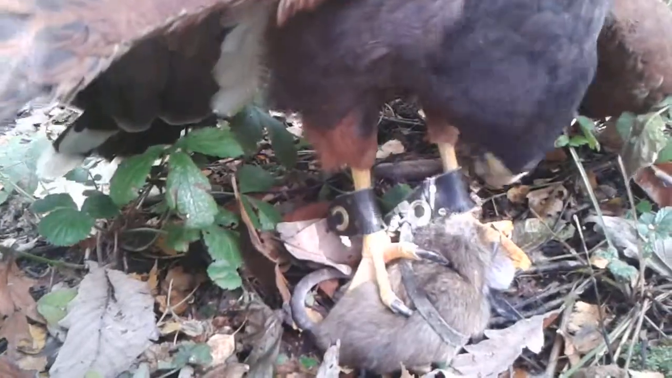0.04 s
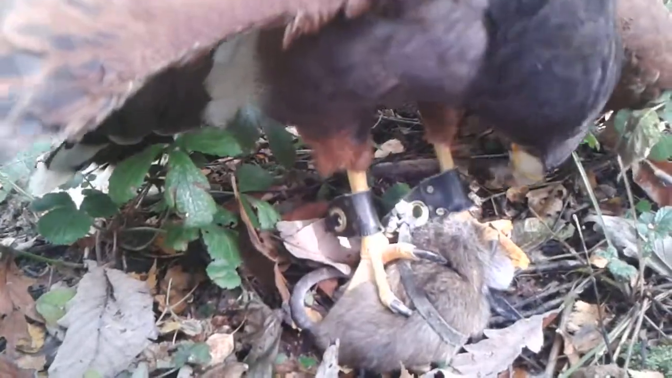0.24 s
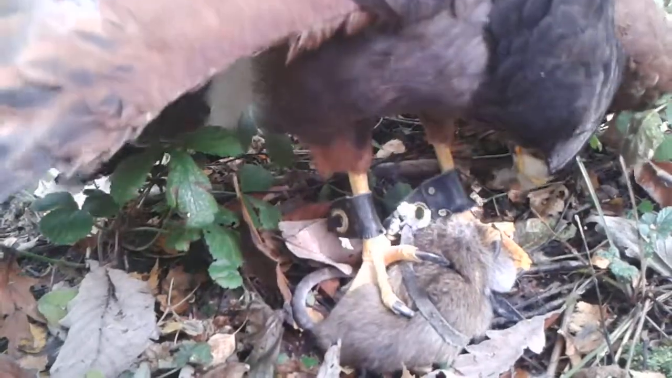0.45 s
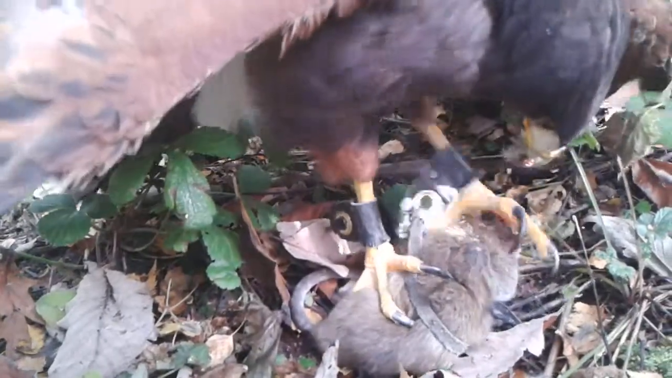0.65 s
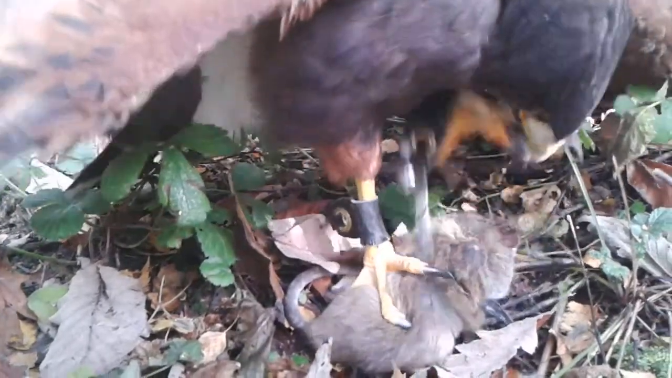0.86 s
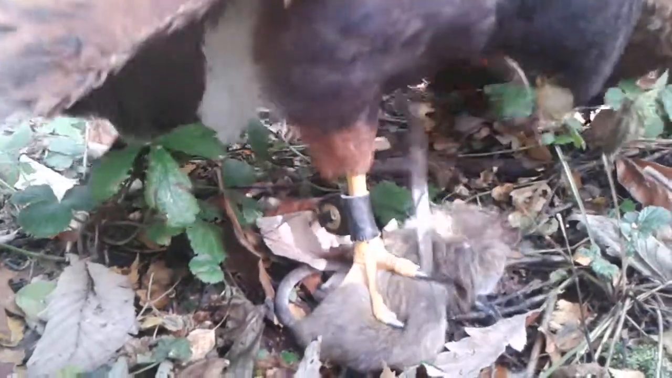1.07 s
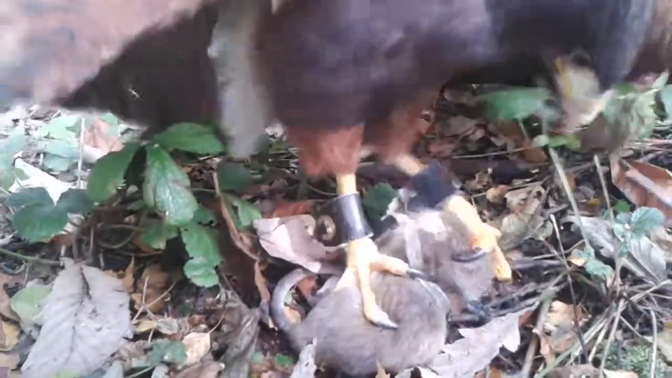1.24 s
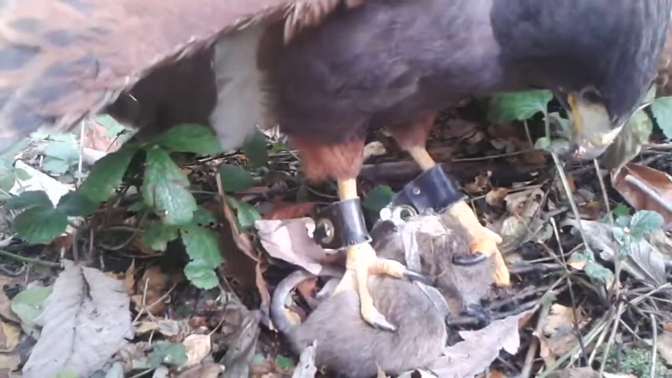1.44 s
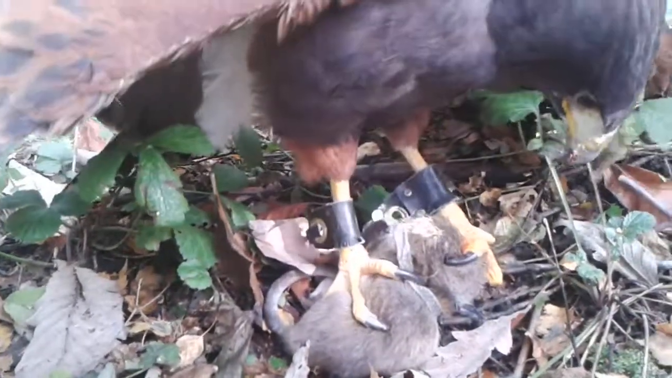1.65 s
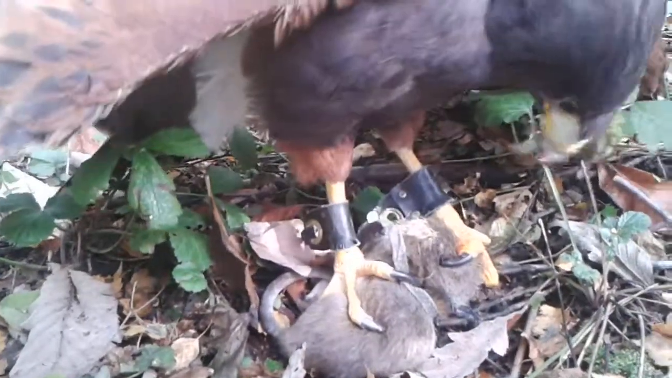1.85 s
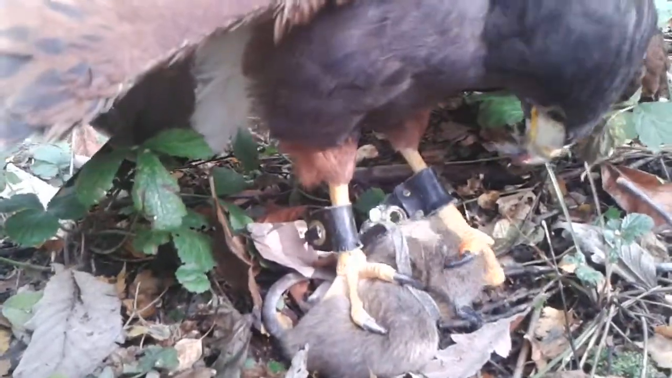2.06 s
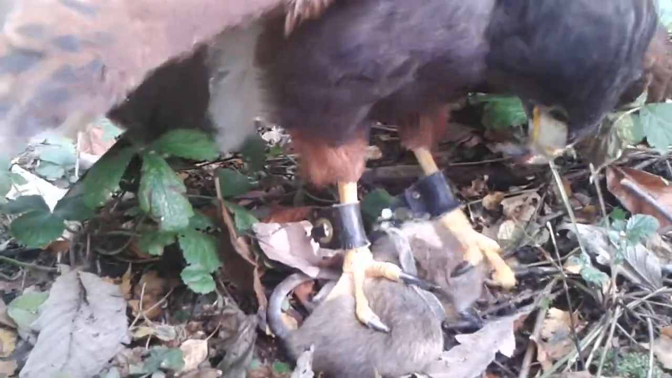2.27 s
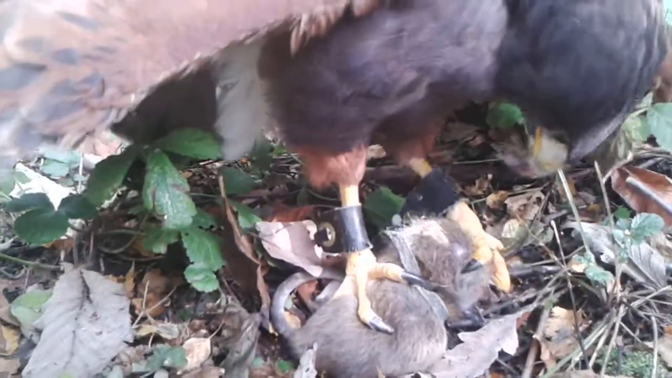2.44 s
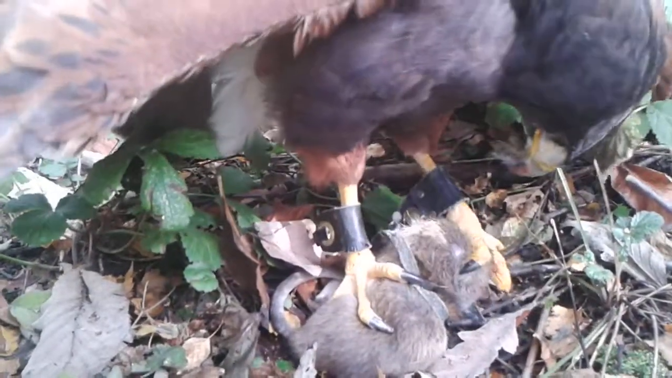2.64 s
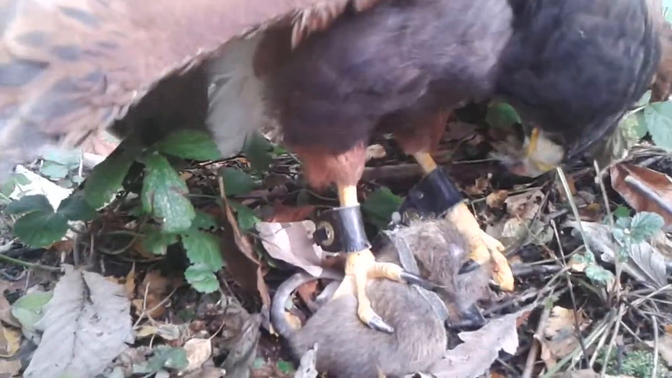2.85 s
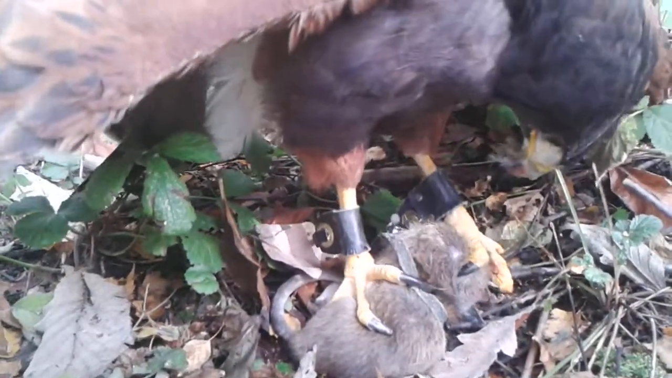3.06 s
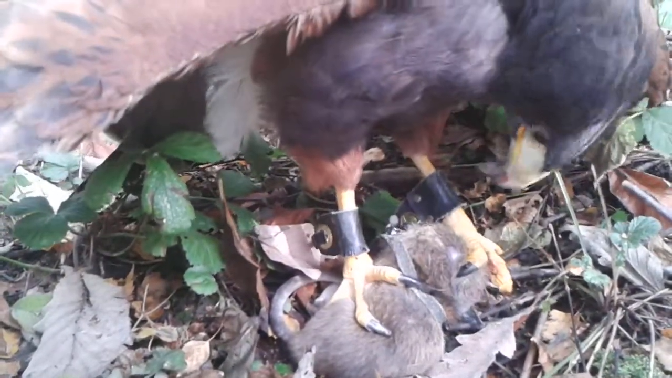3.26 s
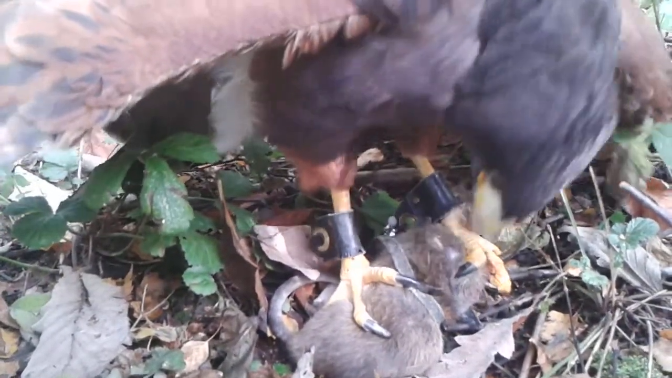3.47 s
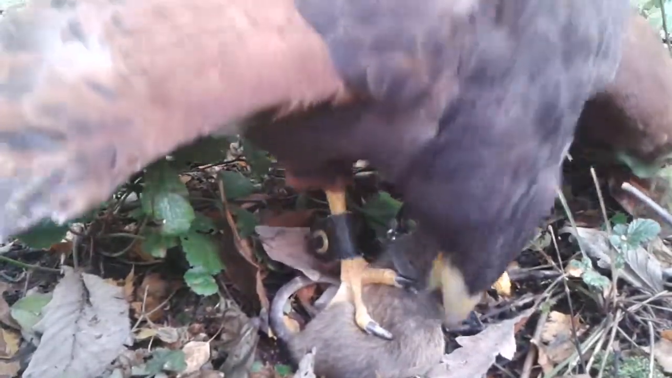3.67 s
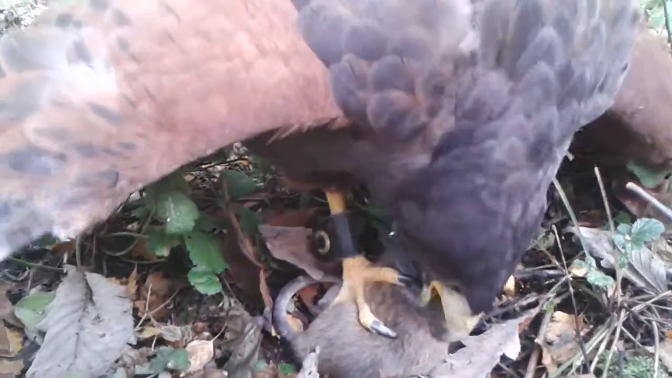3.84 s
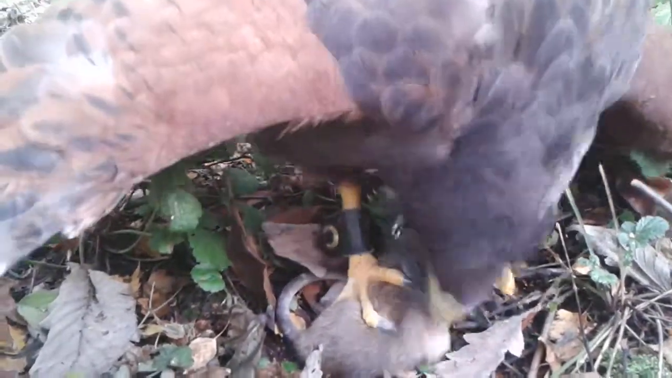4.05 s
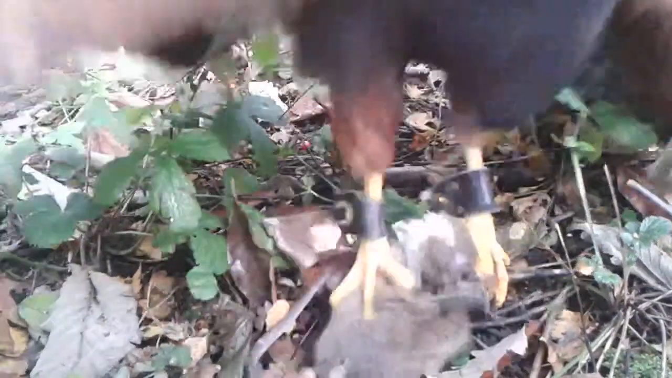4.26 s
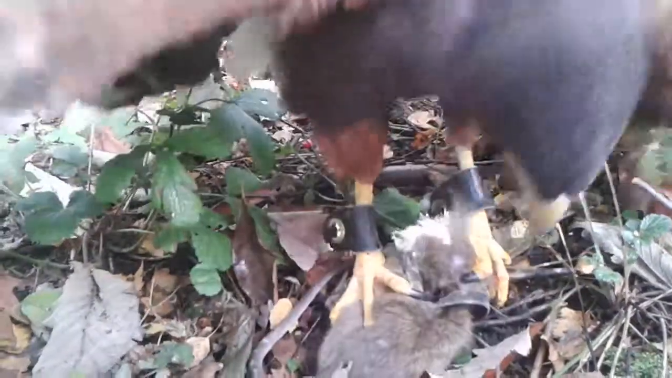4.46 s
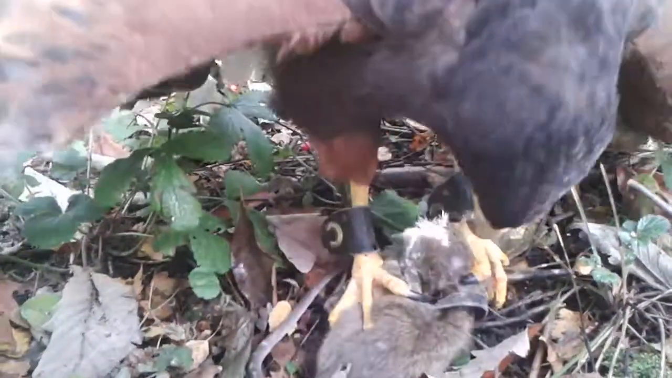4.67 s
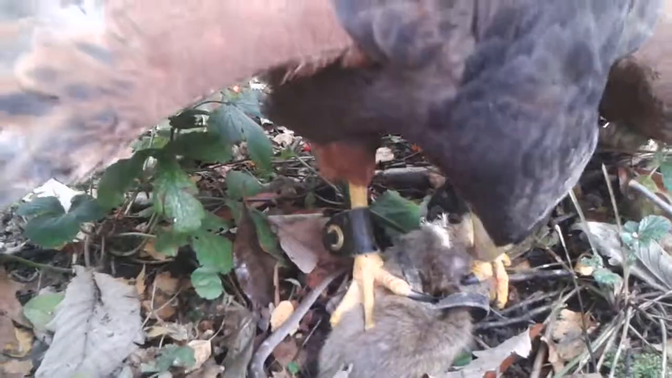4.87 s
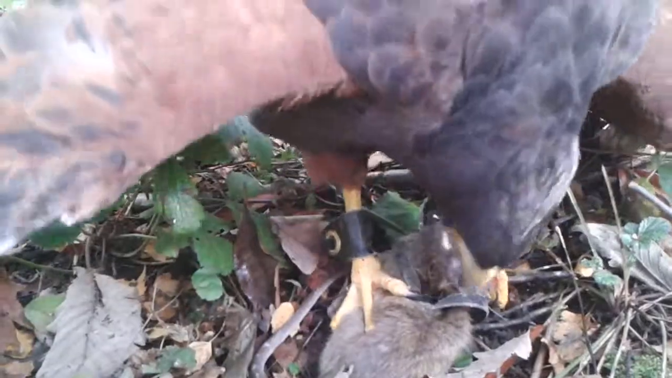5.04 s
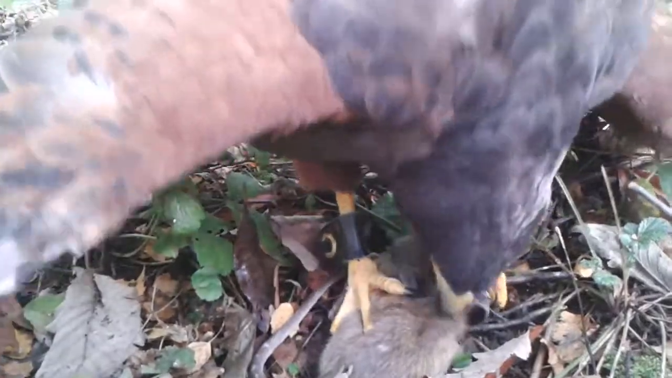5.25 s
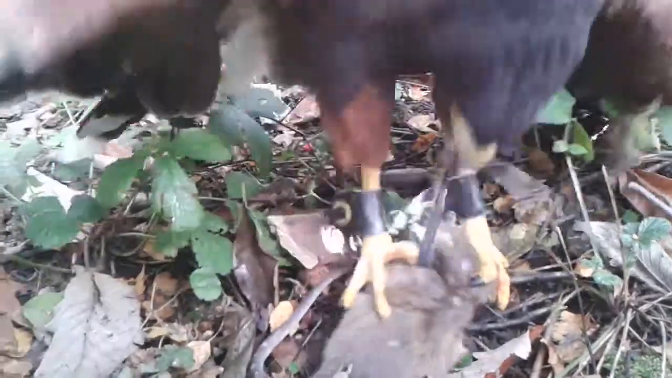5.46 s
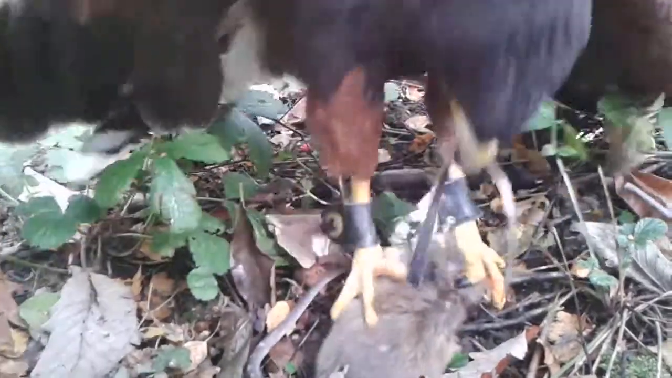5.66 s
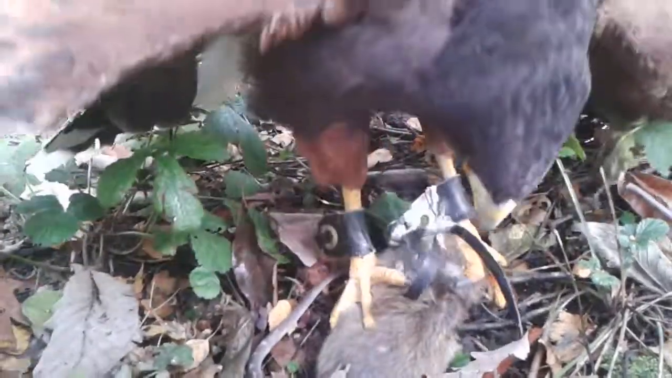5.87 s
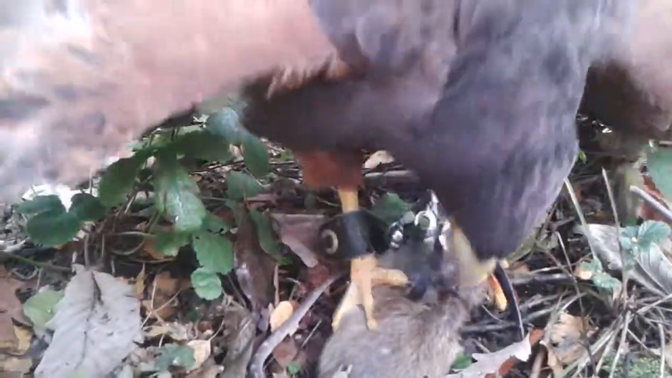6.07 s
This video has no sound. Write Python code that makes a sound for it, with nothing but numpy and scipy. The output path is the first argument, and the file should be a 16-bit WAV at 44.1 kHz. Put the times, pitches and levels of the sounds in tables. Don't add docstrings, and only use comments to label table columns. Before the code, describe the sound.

Quiet woodland floor with faint low air, broken by rattling high bell jingles, crisp leaf crackle and a few hard snaps

```python
import sys
import numpy as np
from scipy import signal
from scipy.io import wavfile
from scipy.ndimage import uniform_filter1d

SR = 44100
rng = np.random.default_rng(int(sys.argv[2]) if len(sys.argv) > 2 else 0)


def pcm_store(signal):
    levels = np.round(np.clip(np.atleast_2d(signal), -1, 1) * 32767)
    wavfile.write(sys.argv[1], SR, levels.astype(np.int16).T)


def voltage_ratio(decibels):
    exponent = np.asarray(decibels, float) / 20
    return 10 ** exponent


N = 269451


def rms_one(x):
    return x / np.sqrt(np.mean(x ** 2) + 1e-20)


def band(x, low_hz, high_hz, order):
    return signal.sosfilt(signal.butter(order, [low_hz, high_hz], "band", fs=SR, output="sos"), x)


def resonance(x, hz, width_hz):
    r = np.exp(-np.pi * width_hz / SR)
    feedback = [1, -2 * r * np.cos(2 * np.pi * hz / SR), r * r]
    return signal.lfilter([(1 - r * r) / 2, 0, (r * r - 1) / 2], feedback, x)


def clicks(seconds, sizes):
    train = np.full(N, 1e-18)
    np.add.at(train, (np.asarray(seconds) * SR).astype(int), sizes)
    return train


def drift(rate_hz):
    r = np.exp(-80 * np.pi * rate_hz / SR)
    noise = rng.standard_normal(N // 40 + 2002)
    slow = signal.lfilter([1], [1, -2 * r, r * r], noise)[2000:]
    return np.interp(np.arange(N) / 40, np.arange(len(slow)), rms_one(slow))


def coloured(sources, spectrum, patchy_db):
    hz, level_db = np.transpose(spectrum)
    edges = 22 * 2 ** np.arange(0, 9.7, 1 / 3)
    out = 0
    for k, (low, high) in enumerate(zip(edges, edges[1:])):
        band_db = np.interp(np.log(low * high) / 2, np.log(hz), level_db)
        gain = voltage_ratio(band_db + patchy_db * drift(6.3))
        out = out + gain * band(sources[k % 2], low, high, order=2)
    return rms_one(out)


def woodland_floor():
    # pitch_hz [Hz], density_db [dB per Hz]
    wood = [(35, -30.5), (60, -11.5), (129, -1.5), (298, -7), (376, -13), (1050, -23.5), (4200, -15.5),
            (15500, -37)]
    return voltage_ratio(-57.5 - 2.5) * coloured(rng.standard_normal((2, N)), wood, patchy_db=0.07)


def stirring():
    # peak_s [s], crisp_db [dB], dull_db [dB], fall_s [s to fall by 20 dB]
    stirs = [(.02, -68, -65, 7.5), (.69, -56, -59.5, 1), (.9, -51, -57, .75), (1.23, -45, -47, 0.1949),
             (1.4, -59, -54.5, .5), (2.22, -60, -63, 0.74), (2.34, -64.5, -52, 0.27), (3.66, -65, -64, .3),
             (4.188, -46.5, -54.5, 0.32), (4.32, -42.5, -51.5, 0.1667), (4.47, -56.5, -55.5, 0.17),
             (5.23, -63, -66.5, .13), (5.436, -54.5, -56, 0.33), (5.6, -51, -52.5, .42)]
    peak_s, crisp_db, dull_db, fall_s = np.transpose(stirs)
    rise_s, still_crisp_db, still_dull_db = 0.075, -76.5, -70.5
    late = np.arange(N) / SR - peak_s[:, None]
    power = voltage_ratio(-20 * np.maximum(late / fall_s[:, None], -late / rise_s)) ** 2
    crisp_gain = np.sqrt(voltage_ratio(crisp_db) ** 2 @ power + voltage_ratio(still_crisp_db) ** 2)
    dull_gain = np.sqrt(voltage_ratio(dull_db) ** 2 @ power + voltage_ratio(still_dull_db) ** 2)
    return crisp_gain, dull_gain


def leaves():
    # pitch_hz [Hz], density_db [dB per Hz]
    crisp_spectrum = [(880, -48.5), (1500, -32.5), (2590, -15.5), (4370, -1), (7760, -19), (16000, -21.5)]
    crisp_gain, dull_gain = stirring()
    grain_db = 3.3 * np.minimum(rng.exponential(1, (2, N)), 5)
    grains = voltage_ratio(grain_db) * rng.choice([-1, 1], (2, N))
    grains_per_s = 1700 * voltage_ratio(3.5 * drift(25))
    grains = grains * (rng.random((2, N)) < grains_per_s / SR)
    crisp = crisp_gain * voltage_ratio(8.5) * coloured(grains, crisp_spectrum, patchy_db=1.8)
    dull = rms_one(resonance(rng.standard_normal(N), 480, 970))
    return crisp + dull_gain * voltage_ratio(-2.0 + 1.8 * drift(15)) * dull


def snaps():
    # start_s [s], snap_db [dB], knock_db
    # [dB], knock_hz [Hz]
    snap_events = [
        (1.2332, -30, -34, 330),
        (1.964, -57, -52, 253),
        (3.6315, -45, -60, 424),
        (3.823, -40.5, -52.5, 1050),
        (3.9792, -40, -45, 883),
        (4.0005, -46, -56, 251),
        (4.2943, 2, -29.5, 327),
        (4.894, -40, -70, 285),
        (5.5956, -9, -34, 1050),
    ]
    out, t = np.zeros(N + SR), np.arange(SR // 20) / SR
    bursts = rng.standard_normal((len(snap_events), len(t)))
    for (start_s, snap_db, knock_db, knock_hz), burst in zip(snap_events, bursts):
        crack = burst * voltage_ratio(-60 * t / .004)
        body = voltage_ratio(snap_db + 9) * band(crack, 3500, 6310, order=3)
        fizz = voltage_ratio(1.4 * snap_db - 2.0) * band(.6 * crack + 3.18 * (t == 0), 600, 6900, order=1)
        knock = np.sin(2 * np.pi * knock_hz * t) * voltage_ratio(-60 * t / .017)
        knock = voltage_ratio(knock_db + 9.5) * band(knock, 90.07, 3400, order=1)
        out[int(start_s * SR):][:len(t)] += body + fizz + knock
    return out[:N]


def shell(seconds, levels_db, damping, modes_hz, detune_hz):
    out, place = np.zeros(N), np.zeros(len(modes_hz))
    starts = (seconds * SR).astype(int)
    detune = detune_hz * rng.standard_normal(levels_db.shape)
    for k, (start, end) in enumerate(zip(starts, [*starts[1:], N - 1])):
        t = np.arange(min(end - start, SR // 8) + 1) / SR
        height = voltage_ratio(levels_db[k])
        phase = np.arcsin(np.clip(place / height, -1, 1))
        turns = np.outer(modes_hz + detune[k], t)
        rings = height[:, None] * voltage_ratio(-damping[k] * t) * np.sin(2 * np.pi * turns + phase[:, None])
        out[start:start + len(t) - 1] = rings[:, :-1].sum(axis=0)
        place = rings[:, -1]
    return out


def jolts(seconds, damping, restarts):
    last = np.maximum(np.searchsorted(seconds, np.arange(N) / SR) - 1, 0)
    step_db = 2.5 * rng.standard_normal(len(seconds))
    lost_db = np.cumsum(.4 * np.maximum(damping[last], 0)) / SR
    restart = (restarts * SR).astype(int)
    latest = np.maximum(np.searchsorted(restart, np.arange(N), "right") - 1, 0)
    lost_db = lost_db - lost_db[restart[latest]]
    return voltage_ratio(uniform_filter1d(step_db[last], size=24) - np.maximum(lost_db, 0))


def pellet(seconds, tick_db, ring_db):
    # pitch_hz [Hz], width_hz [Hz], level_db [dB]
    cavity_modes = [(3240, 250, 17), (4530, 570, -7.5)]
    # pitch_hz [Hz], width_hz [Hz], level_db [dB]
    crack_modes = [(6000, 16000, -14), (12300, 700, -16)]
    chance = rng.random((len(seconds), 5))
    bounce_s = seconds[:, None] + np.cumsum(0.0069 + 0.0044 * chance[:, :2], axis=1)
    bounce_db = tick_db[:, None] - 14 - 14 * chance[:, 2:4]
    train = clicks(seconds, voltage_ratio(tick_db)) - clicks(bounce_s.ravel(), voltage_ratio(bounce_db.ravel()))
    cavity = sum(voltage_ratio(level_db) * resonance(train, hz, width_hz) for hz, width_hz, level_db in cavity_modes)
    contact = clicks(seconds, voltage_ratio((tick_db + ring_db) / 2 - 7.3 * chance[:, 4]))
    crack = sum(voltage_ratio(level_db) * resonance(contact, hz, width_hz) for hz, width_hz, level_db in crack_modes)
    radiated = band(cavity, 2950, 5600, order=6)
    return voltage_ratio(18.0) * (radiated + band(crack, 4500, 16000, order=1))


def bell():
    low_pair_hz = [4052, 4275]
    upper_pairs_hz = [8772, 9160, 14166, 14702]
    # start_s [s], lower_mode_db [dB], upper_mode_db [dB],
    # damping [dB per s; below 0 the rolling pellet feeds the ring]
    foot_steps = [(0.7195, -25.5, -26, 2500), (0.7317, -25.5, -48, -600), (0.7495, -16.5, -30, 3000),
                  (0.7537, -24.5, -50, 448), (0.7882, -18.5, -28, -500), (0.7942, -19, -34, 5000),
                  (.8289, -13.5, -18.5, 498), (0.8433, -9, -22, 200), (0.8508, -6, -37, 700),
                  (.859, -12, -30, 5000), (0.872, -26, -17, 3197), (.884, -36, -26, -600),
                  (0.8945, -13, -26, 700), (0.9008, -25, -22, 5000), (.9197, -14, -37, 3200),
                  (.9375, -17, -25, 3200), (0.9458, -19.5, -32, 700), (.9521, -30, -28, -100),
                  (.9855, -11.5, -21.5, 210), (1.0234, -17, -23, 1002), (1.0354, -36, -17.5, 796),
                  (1.0637, -23.5, -47, 100), (1.081, -16.5, -37, 2200), (1.097, -26, -26, 35),
                  (1.105, -22, -19, 5000), (1.11, -18.5, -34, 2200), (1.1235, -28, -22.5, 300),
                  (1.1343, -15, -26, 200), (1.1681, -23.5, -24, 247), (1.207, -38, -41, -600),
                  (1.2206, -17, -45, -600), (1.2341, -10, -3, 300), (1.2418, -22, -12, 700.5),
                  (1.2469, -11.5, -39, 199.5), (1.2566, -4, -15.5, 459.5), (1.278, -5.5, -13, 1001.5),
                  (1.329, -24, -33.5, -400), (1.3484, -11.5, -40, 29), (1.3574, -15.5, -39.5, 697.5),
                  (1.3645, -16, -29, 149.5), (1.4341, -13.5, -40.5, -1500), (1.4405, -6.5, -44.5, 299.5),
                  (1.4483, -19, -46.5, -600), (1.4643, -17, -37.5, 999.5), (1.51, -26, -58, 598),
                  (1.553, -27, -45, 1498), (1.561, -20, -30, 1498), (1.5721, -20.5, -32, 1500)]
    toes_shift = [(2.14, -43.5, -61, 698), (2.1945, -18.5, -39, 300), (2.2016, -31, -28, 500),
                  (2.221, -24.5, -40, 300), (2.2467, -31, -28, 1200), (2.2818, -31.5, -43, -600),
                  (2.2943, -26.5, -43, 704), (2.3343, -28.5, -48, 30), (2.3423, -30, -35, 800),
                  (2.4106, -44, -38.5, 3000), (2.432, -43, -51, 1200), (2.4665, -36, -53, 1400),
                  (2.4918, -34.5, -57, 1000), (2.5026, -47, -39, 2000), (2.53, -35.5, -58, 1000)]
    first_tug = [(4.207, -32, -64, 900), (4.2361, -25.5, -47, 300), (4.249, -35.5, -29, 1000),
                 (4.2965, -21, -30, 2200), (4.3095, -22, -36, 1200), (4.3244, -32, -45, 30),
                 (4.335, -26.5, -43, 700), (4.343, -24.5, -46, 200), (4.3754, -35, -29, 100),
                 (4.4037, -27.5, -14.5, 30), (4.4175, -32, -12, 450), (4.4324, -23, -26, 250),
                 (4.4485, -45, -24.5, 650), (4.4715, -23.5, -22.5, 450), (4.4843, -33, -28, 200),
                 (4.5145, -31, -27.5, 300), (4.5197, -23, -24, 1000), (4.609, -35, -31.5, 1470),
                 (4.629, -34, -68, 1000)]
    second_tug = [(5.4462, -43.5, -46, 31), (5.4706, -19.5, -30, 63), (5.5057, -33, -27.5, 102),
                  (5.53, -22, -15, 29), (5.544, -9.5, -17, 1498), (5.5536, -13, -33, -1500),
                  (5.5599, -5, -13, 396), (5.5662, -7, -14, 99), (5.583, -10, -16, 302),
                  (5.5955, 1, -8.5, 28.5), (5.6029, -15, -16, 28), (5.634, -17, -22.5, 196),
                  (5.654, -15.5, -9, 98), (5.6672, -8.5, -13.5, 100), (5.6786, -13, -46, -600),
                  (5.6887, -3, -22.5, 438.5), (5.7065, -8.5, -17.5, 198.5), (5.7292, -5, -18, 300.5),
                  (5.755, -19, -17, 427), (5.7768, -9.5, -14, 398), (5.796, -15.5, -21.5, 700),
                  (5.813, -37, -30, 29.5), (5.821, -23, -27, 2500.5), (5.836, -36.5, -58, 999)]
    # start_s [s], middle_pair_db
    # [dB], top_pair_db [dB], lean_db [dB toward the higher mode of each pair]
    hard_strikes = [(0.7184, -70, -47, 2), (0.7453, -43, -66, 10), (0.7885, -39.5, -32, -13),
                    (0.8285, -45, -46, 11), (0.8431, -35.5, -38, 8.5), (0.8501, -39.5, -41, 3.5),
                    (0.894, -35.5, -40.5, -21), (0.9194, -35, -38, -21), (0.937, -33.5, -30, -1),
                    (0.946, -47.5, -33, 3), (0.9852, -34, -32, 3), (1.0237, -40, -38, -17.5),
                    (1.035, -47, -34.5, -10), (1.0636, -42.5, -48, 4), (1.0855, -51, -37.5, 3),
                    (1.0983, -44.5, -54.5, -9), (1.1335, -41, -40, 2), (1.166, -42, -42.5, -1),
                    (1.2335, -27, -21.5, -1.5), (1.2518, -30, -19, -18.5), (1.2644, -40, -33.5, 3.5),
                    (1.279, -32, -30.5, 0.5), (1.339, -43.5, -31, -4), (1.3647, -34.5, -30, -11.5),
                    (1.4325, -38.5, -38, -8.5), (1.446, -39.5, -32.5, -10), (1.5185, -51, -55, -11),
                    (1.5583, -46.5, -38, 0.5),
                    (2.194, -45, -45, 7), (2.206, -51.5, -37, 6), (2.2449, -51, -51, -14),
                   (2.295, -44, -37, 11), (2.3346, -55, -48, -3), (2.467, -51, -53, -1),
                   (2.4928, -51, -41, -4), (2.53, -59, -53, 1), (4.235, -46.5, -46, -1.5),
                   (4.3232, -66, -40.5, -14), (4.3731, -50, -38, 4), (4.401, -34.5, -21.5, -15),
                   (4.418, -32.5, -26, 4.5), (4.4599, -43.5, -30, -4), (4.5156, -35.5, -34, 7),
                   (4.5387, -45, -39, 9), (4.6075, -43, -46.5, 10), (4.6305, -52, -46, 11),
                    (5.47, -39, -28, 12), (5.5055, -52, -36, 6), (5.5307, -25, -15.5, -37),
                 (5.5464, -30, -18.5, -14), (5.5604, -32, -15, -15.5), (5.5813, -26.5, -27, 1),
                 (5.5953, -20.5, -38.5, 13), (5.6024, -19.5, -28.5, 8.5), (5.6516, -29, -18, 4.5),
                 (5.698, -27, -30, -9), (5.729, -33.5, -26, -5.5), (5.753, -30, -29.5, -6.5),
                 (5.775, -34, -36, -10), (5.7958, -38, -24.5, -14)]
    # start_s [s], peak_db #
    # [dB]
    strong_ticks = [(0.8282, -27.5), (0.8431, -30.5), (0.8728, -27.5), (0.9199, -23.5), (0.937, -24),
                     (0.9457, -22.0), (0.9542, -27.0), (0.9853, -26.5), (1.0966, -25), (1.1108, -26.5),
                     (1.2235, -31.5), (1.2337, -22.0), (1.2432, -24.5), (1.2491, -28.0), (1.2574, -17.0),
                     (1.2781, -26.5), (1.2863, -29.5), (1.3484, -31), (1.3564, -30), (1.3654, -26),
                     (1.4379, -23), (1.4467, -25), (1.4576, -26), (1.4649, -31.0),
                     (2.1942, -29.5), (2.2014, -31.5), (2.221, -40), (2.239, -36.0), (2.295, -38),
                    (5.5294, -25.5), (5.5446, -20), (5.5586, -16.5), (5.5654, -13.5), (5.5798, -20),
                    (5.596, -13.5), (5.603, -18), (5.6295, -38), (5.648, -35), (5.6666, -21.0),
                    (5.6782, -34), (5.6876, -26.5), (5.7058, -29), (5.7294, -29), (5.7523, -31),
                    (5.7754, -25), (5.7964, -32)]

    strikes = np.array(foot_steps + toes_shift + first_tug + second_tug)
    strike_s, pair_db, damping = strikes[:, 0], strikes[:, 1:3], strikes[:, 3]
    hum = shell(strike_s, pair_db, damping, low_pair_hz, detune_hz=3.3)
    hum = band(hum, 3600, 4800, order=3)

    hard_s, middle_db, top_db, lean_db = np.transpose(hard_strikes)
    lower, higher = -np.maximum(lean_db, 0), np.minimum(lean_db, 0)
    upper_db = np.transpose([middle_db + lower, middle_db + higher, top_db + lower, top_db + higher])
    fade = np.full(len(hard_s), 170)
    shine = shell(hard_s, upper_db, fade, upper_pairs_hz, detune_hz=4.5)
    shine = band(shine * jolts(strike_s, damping, hard_s), 6000, 17500, order=1)

    ring_db = pair_db.max(axis=1)
    ticks = pellet(strike_s, ring_db - 26.5, ring_db)
    strong_tick_s, knock_db = np.transpose(strong_ticks)
    strong_tick_sound = pellet(strong_tick_s, knock_db - 0.6, np.interp(strong_tick_s, strike_s, ring_db))
    return hum + shine + ticks + strong_tick_sound


def scene():
    jingle = bell()
    loudness = uniform_filter1d(np.abs(jingle), size=SR // 16)
    floor = woodland_floor() / (1 + 3.0 * loudness)
    return (floor + leaves() + snaps() + jingle)[None]


def roll_off(x):
    return signal.sosfilt(signal.butter(12, 16650, fs=SR, output="sos"), x)


def record(dry):
    overload, cutoff_hz = 0.66, 16300
    clipped = np.clip(dry, -overload, overload)
    top_cut = signal.cheby2(10, 50, cutoff_hz, fs=SR, output="sos")
    return roll_off(signal.sosfilt(top_cut, clipped))


dry = scene()
out = record(dry)
pcm_store(out)
```